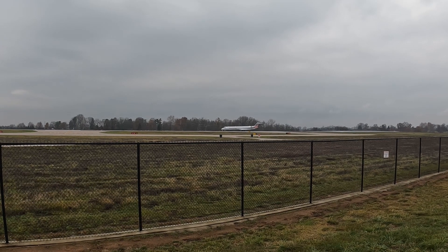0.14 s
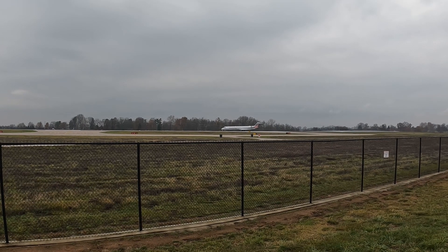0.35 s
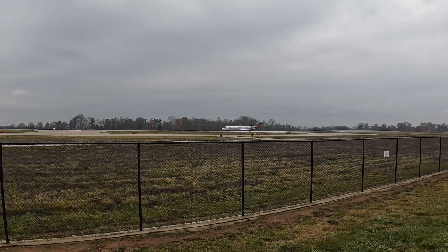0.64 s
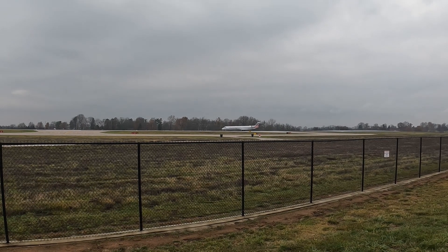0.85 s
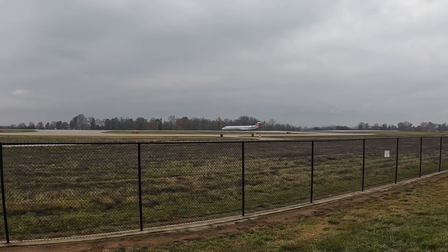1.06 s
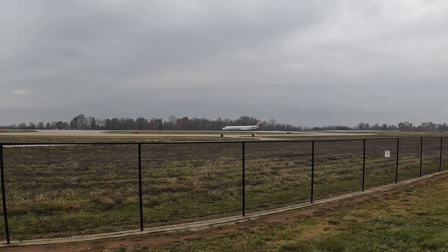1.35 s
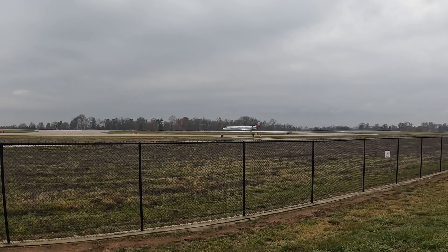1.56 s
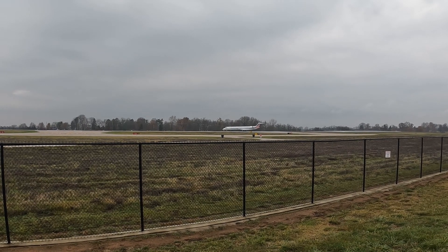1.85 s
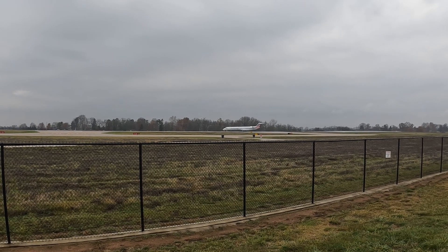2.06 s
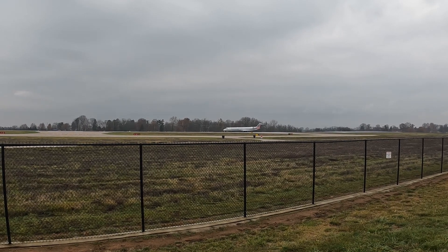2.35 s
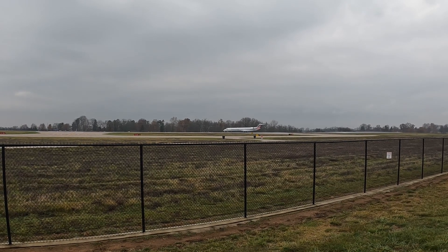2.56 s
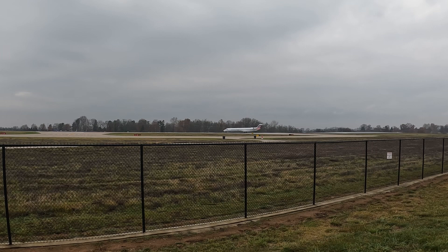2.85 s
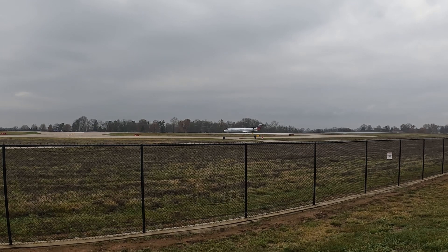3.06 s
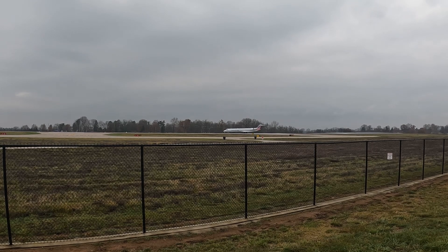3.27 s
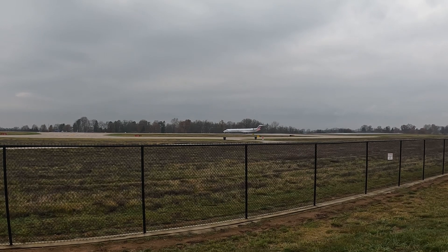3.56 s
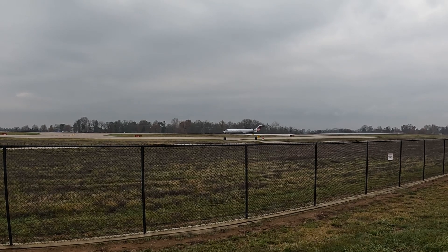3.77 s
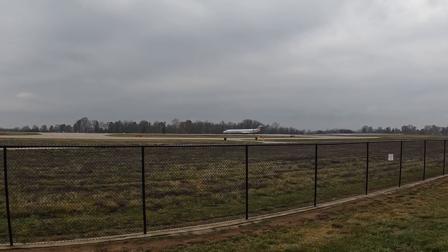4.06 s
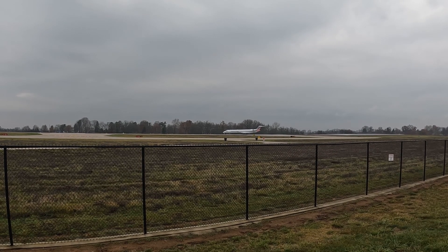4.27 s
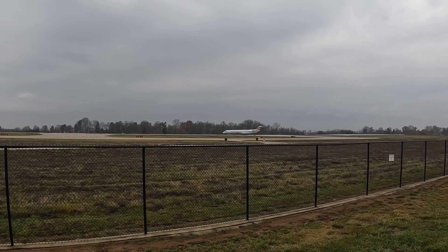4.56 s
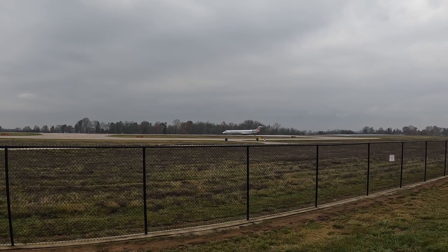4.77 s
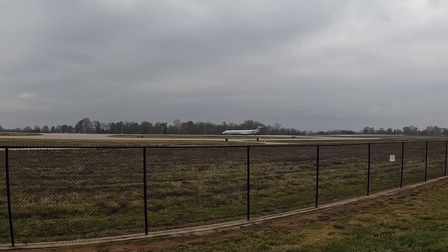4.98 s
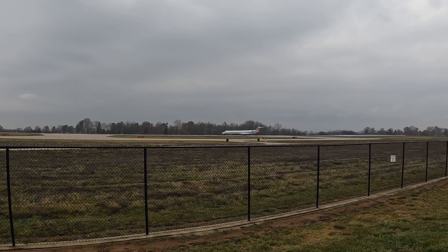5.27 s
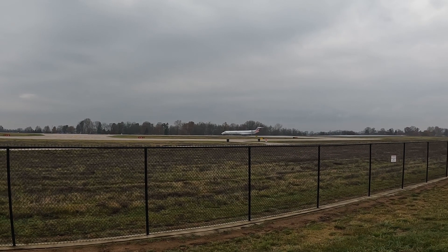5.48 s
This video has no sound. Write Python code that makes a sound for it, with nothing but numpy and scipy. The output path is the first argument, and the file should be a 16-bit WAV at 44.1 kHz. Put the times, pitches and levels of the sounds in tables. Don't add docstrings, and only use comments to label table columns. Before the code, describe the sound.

Across a wide open field, a passenger jet's engines idle with a wavering fan whine, soft inlet hiss and lumpy low exhaust rumble. About halfway through, the whine begins to climb, smoothly and faster, while the roar strengthens. Heard from far away on a handheld microphone, the sound is nearly mono until a wind gust strikes near the end, thudding and widening into stereo.

```python
import sys
import numpy as np
from scipy import signal
from scipy.fft import rfft, irfft, next_fast_len
from scipy.io import wavfile
from scipy.ndimage import uniform_filter1d, map_coordinates

SR = 44100
rng = np.random.default_rng(int(sys.argv[2]) if len(sys.argv) > 2 else 0)


def to_wav(sig):
    pcm = np.clip(np.atleast_2d(sig), -1, 1) * 32767
    pcm = np.round(pcm).astype(np.int16)
    wavfile.write(sys.argv[1], SR, pcm.T)


def magnitude_from_level(level_db):
    exponent = np.asarray(level_db, float) / 20
    return 10 ** exponent


N = 248724
TIME_S = np.arange(N) / SR


def unit(x):
    return x / np.sqrt(np.mean(x ** 2) + 1e-20)


def curves(rows):
    s, *columns = np.transpose(rows)
    return [np.interp(TIME_S, s, column) for column in columns]


def bumps(rows):
    s, db, half_width_s = np.transpose(rows)[..., None]
    t = np.arange(0, N + 64, 64) / SR
    total_db = np.sum(db * np.exp(-((t - s) / half_width_s) ** 2), axis=0)
    return np.interp(TIME_S, t, total_db)


def wobble(rate):
    at = np.arange(0, N + 8, 8)
    knots = rng.standard_normal(int(N * rate / SR) + 4)
    return np.interp(np.arange(N), at, map_coordinates(knots, [at * rate / SR]))


def rush(spectrum, patchy_db):
    z = signal.stft(rng.standard_normal(N), nperseg=512)[2]
    field = uniform_filter1d(uniform_filter1d(rng.standard_normal(z.shape), 5, 0), 20, 1)
    patchy = signal.istft(z * magnitude_from_level(patchy_db * unit(field)), nperseg=512)[1][:N]
    hz, db = np.transpose(spectrum)
    m = next_fast_len(N + 8192)
    log_hz = np.log(np.fft.rfftfreq(m, 1 / SR) + 1)
    colour = magnitude_from_level(np.interp(log_hz, np.log(hz + 1), db))
    return unit(irfft(rfft(patchy, m) * colour, m)[:N])


def even(x):
    span, share = int(.07 * SR), .7
    power = uniform_filter1d(uniform_filter1d(x ** 2, span), span)
    return unit(x / (np.abs(power) + 1e-9) ** (share / 2))


def carried(hz, spread_hz):
    turn = 2 * np.pi * np.cumsum(hz) / SR
    return unit(wobble(spread_hz) * np.cos(turn) + wobble(spread_hz) * np.sin(turn))


def tone(hz, smear, spread_hz):
    phase = 2 * np.pi * np.cumsum(hz) / SR + 0.27 * wobble(9)
    clean = np.sqrt(2) * np.sin(phase)
    return np.sqrt(1 - smear) * clean + np.sqrt(smear) * carried(hz, spread_hz)


# (time [s], peak [dB], half width [s])
FIZZES = [(0.1401, -85, 0.009), (0.1725, -80, 0.009), (0.2947, -84, 0.009), (0.3421, -90, 0.009),
          (0.4444, -77, 0.009), (0.5242, -80, 0.009), (0.5726, -77, 0.009), (0.7218, -75, 0.009),
          (0.8629, -87, 0.009), (0.9083, -84, 0.009), (1.1403, -77, 0.009), (1.1644, -82, 0.009),
          (2.135, -85, 0.009), (2.3161, -85, 0.009), (2.3444, -83, 0.009), (2.391, -85, 0.009),
          (2.6898, -81, 0.009), (2.7297, -78, 0.009), (3.039, -82, 0.009), (3.235, -85, 0.009),
          (3.3937, -84, 0.009), (3.6594, -85, 0.009), (3.7589, -86, 0.009), (3.9, -82, 0.009),
          (4.3166, -79, 0.009), (4.5321, -77, 0.009), (4.8894, -83, 0.009), (4.9217, -78, 0.009),
          (4.9377, -77, 0.009), (4.9776, -75, 0.009), (5.0095, -73, 0.009), (5.1961, -75, 0.009),
          (5.4071, -75, 0.009), (5.4201, -71, 0.009), (5.4394, -79, 0.009), (5.4605, -74, 0.009),
          (5.5563, -75, 0.009)]


def fizz():
    s, db, half_width_s = np.transpose(FIZZES)[..., None]
    t = np.arange(0, N + 64, 64) / SR
    puffs = magnitude_from_level(db - 12) * np.exp(-((t - s - half_width_s) / half_width_s) ** 2)
    gain = np.interp(TIME_S, t, np.sum(puffs, axis=0))
    return gain * rush([(7000, -30), (8500, 0), (13300, -3), (13700, -40)], 2)


def circuit_whistle(push_db):
    return magnitude_from_level(-110 + .4 * (push_db - 1.5)) * carried(np.full(N, 11750.), 350)


# (frequency [Hz], level [dB per Hz])
BUFFET = [(8, -22.5), (15, -4.5), (40, -6.5), (90, -7.5), (150, -11), (250, -46.5), (400, -120)]
# (frequency [Hz], level [dB per Hz])
FLUTTER = [(50, -120), (90, -10), (150, -12.5), (306, -0.5), (360, -14), (460, -15), (900, -36.5),
           (1500, -120)]


def port_wind(buffet_db, flutter_db):
    buffet = magnitude_from_level(buffet_db) * unit(magnitude_from_level(1.2 * wobble(20)) * rush(BUFFET, 0.93))
    return buffet + magnitude_from_level(flutter_db) * unit(magnitude_from_level(3.0 * wobble(25)) * rush(FLUTTER, 1.3))


# (time [s], change [dB], half width [s])
PUFFS = [
    (5.04, -25, 0.019),
    (5.185, 10.5, 0.01),
    (5.225, 1.5, 0.0099),
    (5.26, -6, .02),
    (5.355, 12.5, 0.012),
    (5.42, 12.5, 0.019),
    (5.57, -6, 0.013),
]
# (time [s], change [dB], half width [s])
FLUTTER_STRIKE = [
    (5.18, 6, .03),
]


def gust():
    strike_s, fade_db_per_s = 5.18, 2
    before_s = np.minimum(TIME_S - strike_s, 0)
    eased_db = bumps(PUFFS) - fade_db_per_s * np.maximum(TIME_S - strike_s, 0)
    buffet_db = -41.5 + 78 * before_s + eased_db
    flutter_db = -50 + 220 * before_s + eased_db + bumps(FLUTTER_STRIKE)
    side = port_wind(buffet_db, flutter_db)
    mid = port_wind(buffet_db - 1.5, flutter_db + 0.5) - 0.78 * side
    return mid, side


# (frequency [Hz], level [dB per Hz])
SCATTER = [(260, -35), (450, -22), (1080, -9), (1300, -9.5), (2120, -16), (2950, -29), (4720, -39),
           (5400, -24), (7020, -61), (11900, -120)]


def width(tones):
    open_s, open_db, open_db_per_s = 5.08, -7.5, 68
    side_db = open_db + open_db_per_s * np.minimum(TIME_S - open_s, 0)
    lag = np.roll(tones, 5) - np.roll(tones, -5)
    return magnitude_from_level(side_db) * (.25 * lag + magnitude_from_level(-58.5) * rush(SCATTER, 3.5))


# (time [s], thrust [dB], clearness of the air path [dB])
THRUST = [(0, -26.5, -3), (.35, -31, 2.5), (.55, -29.5, 3), (.9, -30, 0.5), (1.0, -29.5, -1.5),
          (1.1, -33.5, 1.5), (1.2, -32, 0), (1.6, -32, -1), (2.1, -34, -0.5), (2.45, -32.5, 0),
          (2.8, -31.5, .5), (3.2, -31.5, 2.5), (3.7, -32, 2.5), (4.05, -29, -0.5), (4.4, -27.5, -0.5),
          (4.8, -25, -0.5), (5.05, -25.5, 1.5), (5.2, -25, 2), (5.4, -26, 3.5), (5.64, -24, 2.5)]


def throttle():
    thrust_db, clear_db = curves(THRUST)
    return thrust_db + 32, clear_db


# (frequency [Hz], level [dB per Hz])
THUMP = [(8.8, -26), (15, -2), (45, 2.5), (90, -14.5), (120, -19.5), (200, -120)]
# (time [s], change [dB], half width [s])
BOOMS = [(.1, -5, 0.034), (.3, 1, .03), (.4, 14.5, 0.043), (.5, -11, .035), (.58, 8, 0.027), (.7, 5, 0.095),
         (.85, -2, 0.063), (.93, 6.5, .035), (1.08, 1, 0.036), (1.17, 10, 0.03), (1.28, 9.5, .03),
         (1.35, -3, 0.035), (1.43, 3.5, 0.053), (1.58, -9, 0.06), (1.73, 1, 0.043), (1.89, -7, 0.03),
         (2.01, 0, .03), (2.3, 2, 0.11), (2.46, -1, .04), (2.72, 5.5, .06), (2.87, 10, 0.037),
         (3.03, -4, .04), (3.15, 6, 0.051), (3.3, -5, 0.065), (3.44, -7, 0.027), (3.67, 5.5, 0.15),
         (3.82, -8, 0.029), (3.93, 6.5, .05), (4.1, -3, .04), (4.2, -1, .04), (4.35, 7, 0.014),
         (4.48, -10, 0.033), (4.62, 3.5, 0.067), (4.73, -12, 0.046), (4.85, -10, 0.061), (5, 4, .04),
         (5.3, 7, 0.064), (5.42, 6.5, 0.062), (5.49, -10, 0.034), (5.61, 2, 0.036)]


def thump(push_db):
    return magnitude_from_level(-35.5 + 1.33 * push_db + bumps(BOOMS)) * even(rush(THUMP, 0.41))


# (frequency [Hz], level [dB per Hz])
DRONE = [(32, -40), (55, 0.5), (80, 1.5), (110, -1), (140, -20.5), (200, -120)]
# (time [s], change [dB], half width [s])
SURGES = [(.1, 4, 0.042), (.24, -3, 0.034), (.36, 8, .07), (.46, 3.5, 0.023), (.6, 3.5, .04),
          (.68, -8, 0.03), (.73, 4.5, .025), (.85, -12, 0.1), (.95, 3, 0.023), (1.15, 7, 0.023),
          (1.4, -6.5, 0.089), (1.5, 5, 0.045), (1.8, 3, 0.11), (2.09, -7, .03), (2.2, 5, .04),
          (2.31, -6, .025), (2.7, 6, .04), (2.9, 0.5, 0.091), (3.1, 2, 0.022), (3.45, -3, .05),
          (3.6, 6, .04), (3.8, -7, 0.056), (3.95, 2, 0.021), (4.33, 3.5, 0.036), (4.45, -4, 0.021),
          (4.56, -1, 0.035), (4.78, 1.5, 0.033), (4.86, -1, .025), (4.94, 3, 0.034), (5.05, 4.5, .04),
          (5.14, 0, 0.034), (5.35, 8.5, 0.031), (5.48, 7, 0.044), (5.59, 7.5, 0.035)]


def drone(push_db):
    return magnitude_from_level(-35.5 + 0.96 * push_db + bumps(SURGES)) * even(rush(DRONE, 0.75))


# (frequency [Hz], level [dB per Hz])
ROAR = [(80, -42.5), (115, -2.5), (151, -1), (207, -12.5), (260, -25.5), (330, -29), (430, -51),
        (730, -120)]
# (time [s], change [dB], half width [s])
ROLLS = [(0, -14.5, 0.032), (.15, -2, .08), (.4, 2, 0.07), (.6, -0.5, .06), (.97, -3.5, 0.049),
         (1.17, 6, 0.069), (1.57, 1, 0.043), (1.72, -4.5, 0.037), (1.8, 3, 0.023), (1.95, -1, 0.045),
         (2.1, 2, 0.058), (2.27, -4.5, 0.055), (2.45, -1, 0.029), (2.58, -6.5, 0.025), (2.68, -6, .02),
         (2.95, 2, 0.044), (3.22, -8, 0.062), (3.36, 2.5, 0.06), (3.6, -1, .1), (3.9, 0, 0.11),
         (4.25, 3, .04), (4.45, 4.5, .03), (4.6, -2, 0.064), (4.76, -3.5, 0.02), (4.95, -0.5, 0.064),
         (5.14, 0.5, .04), (5.34, -5.5, .025), (5.42, 5.5, .03), (5.6, 2, .05)]


def roar(push_db):
    return magnitude_from_level(-35.5 + 0.85 * push_db + bumps(ROLLS)) * even(rush(ROAR, 0.95))


# (frequency [Hz], level [dB per Hz])
GROWL = [(150, -61), (190, -4), (230, 1.5), (290, -5), (360, -11.5), (450, -66)]
# (time [s], change [dB], half width [s])
GROWLS = [(.02, 13, 0.058), (.28, 11, .03), (.38, 18, 0.069), (.5, 13.5, 0.033), (.63, 12, .06),
          (.73, 7, .03), (1.05, 6, .04), (1.16, 16.5, .04), (1.32, 7.5, .04), (1.5, 9.5, 0.044),
          (1.68, 9, .025), (2.88, 8.5, .04), (2.97, 11.5, .035), (3.25, 11, .03), (3.42, 6.5, .05),
          (4.13, 6, .04), (4.37, 8.5, .04), (5.05, 11.5, 0.12), (5.18, 12.5, 0.035), (5.3, 9.5, .06)]


def growl():
    return magnitude_from_level(-56 + bumps(GROWLS)) * even(rush(GROWL, .5))


# (frequency [Hz], level [dB per Hz])
BODY = [(150, -25.5), (250, -1), (354, -4), (446, -1.5), (524, -3.5), (796, -5), (877, -5), (1390, -9.5),
        (2100, -20), (2730, -42.5), (4620, -120)]


def body(push_db, clear_db):
    return magnitude_from_level(-47 + 0.22 * push_db + clear_db) * rush(BODY, 0.37)


# (frequency [Hz], level [dB per Hz])
HISS = [(1000, -39.5), (1700, -2), (2140, -5.5), (2800, -5.5), (3810, -5), (4600, -10), (5400, -15.5),
        (6300, -23.5), (7020, -28.5), (8000, -33.5), (8600, -35.5), (8950, -54.5), (9400, -76.5),
        (14000, -86)]
# (time [s], change [dB], half width [s])
HISS_SWELLS = [
    (.08, -1.5, 0.044),
    (.55, 1, 0.18),
    (1.45, -0.5, .1),
    (2.38, 2, 0.16),
    (3.3, -2.5, 0.28),
    (3.9, 0, .12),
    (4.35, 1, 0.14),
    (5.19, 2, 0.044),
]


def hiss(push_db, clear_db):
    level_db = -56 + .6 * push_db + 0.29 * clear_db + bumps(HISS_SWELLS)
    return magnitude_from_level(level_db + 0.19 * wobble(6.5)) * rush(HISS, 1.1)


# (frequency [Hz], level [dB per Hz])
FRINGE = [(8300, -40), (8800, 0), (9500, -3), (9900, -40)]


def fringe(push_db):
    return magnitude_from_level(-108 + .5 * push_db + 4 * wobble(22)) * rush(FRINGE, 7)


# (time [s], change [dB], half width [s])
HUM_SWELLS = [(0, 0, .25), (.42, 7.5, .05), (.56, 11, .03), (.66, 13, .04), (.74, -1, .03),
              (.82, 13.5, .03), (.92, 9, .03), (1.02, -1.5, .07), (1.5, 4, 0.13), (1.8, -3, 0.085),
              (2.1, 1.5, .12), (2.4, 3, .1), (2.7, 0.5, .1), (3, 3, 0.21), (3.5, -12, .25), (4.85, -20, .4),
              (5.6, -9, 0.45)]


def combustor():
    start_hz, drift_hz, drift_s = 685, 80, 2
    hum_hz = start_hz + drift_hz / 2 * (1 + np.tanh((TIME_S - drift_s) / .9))
    return magnitude_from_level(-56 + bumps(HUM_SWELLS) + 0.75 * wobble(14.0)) * carried(hum_hz, 120)


# (time [s], change [dB], half width [s])
GENERATOR_SWELLS = [
    (.4, -11, 0.4),
    (1.7, 5, 0.54),
    (2.35, 9, 0.069),
    (3.3, 12, .08),
    (3.7, -7, 0.18),
    (4.25, 4.5, .25),
    (5.4, -9.5, 0.5),
]


def generator():
    level_db = -64 + 1.6 * wobble(8.2) + bumps(GENERATOR_SWELLS)
    return magnitude_from_level(level_db) * tone(np.full(N, 800), 0.15, 25)


# (time [s], change [dB], half width [s])
WHINE_SWELLS = [
    (2.45, 6, .15),
    (3.15, 6, .25),
    (4.95, 5, .08),
]


def compressor(blade_hz, progress, awake):
    idle_hz, rise_hz, bend = 7460, 1050, .65
    whine_hz = idle_hz + rise_hz * uniform_filter1d(progress ** bend, SR // 4, mode="nearest")
    whine_db = -98 + 7 * awake - 7 * progress + 2.7 * wobble(8.2) + bumps(WHINE_SWELLS)
    whine = magnitude_from_level(whine_db) * tone(whine_hz, .8, 90)
    sideband_swells = [(3.05, -11, .2), (3.45, 2, .12), (4.1, 4, 0.16), (4.55, -19, .2), (5.2, -12, .5)]
    sideband_db = -105 + 5 * awake - 40 * progress ** 2 + bumps(sideband_swells)
    sideband = magnitude_from_level(sideband_db + 4.4 * wobble(8.3)) * tone(whine_hz + blade_hz, .6, 40)
    return whine + sideband


# (time [s], blade rate [Hz])
FAN = [(0, 1292), (1.3, 1289), (2.45, 1289), (2.75, 1309), (3, 1352), (3.5, 1458), (4, 1593), (4.3, 1695),
       (4.6, 1837), (4.9, 1973), (5.1, 2048), (5.3, 2090), (5.5, 2132), (5.64, 2166)]


def spool():
    idle_hz, takeoff_hz = 1288, 2150
    blade_hz = uniform_filter1d(curves(FAN)[0], SR // 8, mode="nearest")
    progress = np.clip((blade_hz - idle_hz - 6) / (takeoff_hz - idle_hz), 0, 1.1)
    return blade_hz, progress, np.tanh(11 * progress)


def spool_level(row, progress, awake):
    idle_db, wake_db, full_db = row
    return idle_db + wake_db * awake + full_db * progress


# (idle [dB], throttle gain [dB], full-speed gain [dB])
INFLOW_DB = [(-55.5, -13.5, 12), (-66.5, -2, 2.5), (-72.5, 5.5, -6)]
# (time [s], change [dB], half width [s])
INFLOW_SWELLS = [
    (.35, 9, 0.6),
    (5.2, 11.5, 0.39),
]
INFLOW_SHARES = [0.33, 1.1, -0.58]


def inflow(blade_hz, progress, awake):
    shapes = [(.95, 497.2), (1.95, 894), (2.95, 892)]  # (multiple, spread Hz)
    swell_db = bumps(INFLOW_SWELLS)
    humps = np.zeros(N)
    for row, share, (multiple, spread_hz) in zip(INFLOW_DB, INFLOW_SHARES, shapes):
        level_db = spool_level(row, progress, awake) + share * swell_db + wobble(5)
        humps += magnitude_from_level(level_db) * carried(multiple * blade_hz, spread_hz)
    return humps


# (idle [dB], throttle gain [dB], full-speed gain [dB])
ORDERS_DB = [(-56, -3.5, 10), (-80, 17, -1), (-66, -2.5, -12.5), (-77, 3, -18)]
# (time [s], change [dB], half width [s])
EDDIES_1ST = [(.36, 3.5, 0.057), (.48, 4, 0.059), (1.07, 5, 0.026), (.18, -8, 0.023), (.82, -6.5, 0.044),
              (.945, -1, .015), (.995, 11, 0.032), (1.03, -13, 0.013), (1.2, 11, 0.039), (1.39, -9, 0.11),
              (1.58, 3.5, 0.061), (1.659, 5, .015), (1.69, -9, .015), (1.74, 5, 0.014), (1.79, 13.5, 0.016),
              (1.83, 1, .015), (1.885, 2, .025), (1.96, 8, 0.17), (2.115, -11, 0.016), (2.145, 9, 0.013),
              (2.28, -7, 0.093), (2.64, -6, 0.064), (2.9, 5.5, 0.12), (3.2, 0.5, 0.065), (3.4, -3, .02),
              (3.55, 4, 0.093), (3.79, 4, 0.054), (3.87, -3, 0.02), (3.95, 7, 0.044), (4.04, 2, .035),
              (4.09, -9, 0.013), (4.17, 10, 0.086), (4.55, 3, .03), (4.7, -1, 0.036), (4.83, 2, 0.036),
              (4.95, 4, 0.019), (4.36, -8, 0.18), (4.63, -11, 0.031), (4.98, -28, 0.0085),
              (5.01, 11, 0.015), (5.09, -14, 0.046), (5.155, 11, 0.0084), (5.2, 0.5, 0.035), (5.4, 4, 0.39),
              (5.64, -9, 0.056)]
EDDIES_2ND = [(0, 19, 0.045), (.24, 18, .07), (.48, 21, 0.076), (.96, 12, 0.065), (2.3, 14, 0.089),
              (2.64, 16, .07), (3.01, 6, .04), (3.14, 7, 0.061), (3.24, 0.5, .04), (3.38, 1, .07),
              (3.6, 5.5, 0.1), (3.72, -1, .04), (3.84, 5, .07), (4.17, 12, 0.055), (3.93, 5, 0.011),
              (3.965, 0, 0.014), (4.05, -6, .03), (4.3, -15, .05), (4.42, 7.5, .03), (4.55, 6, .05),
              (4.68, 2.5, .05), (4.8, 10, .04), (4.92, 3.5, .04), (5.01, 3, 0.028), (5.12, 11, .05),
              (5.23, 10, .04), (5.33, -6, .03), (5.44, 11, 0.043), (5.54, 1, .03), (5.62, 6, 0.035)]
EDDIES_3RD = [(0, 15.5, 0.025), (.48, 0, 0.077), (.84, -2, 0.051), (1.08, 3, .07), (1.2, -20, 0.064),
              (1.74, 4.5, 0.091), (2.04, -12, 0.083), (2.28, -9.5, 0.056), (2.4, 3, 0.037), (2.6, 1, .04),
              (2.7, 3.5, 0.036), (2.82, 2, .06), (2.96, 5, .04), (3.1, 7, .02), (3.24, 8, 0.064),
              (3.36, -12.5, 0.083), (3.88, 13, .12), (4.1, 6, .07), (4.25, 5, .05), (4.44, -5.5, .08),
              (4.68, 6, 0.076), (5, 5, .12)]
EDDIES_4TH = [(.5, -3, .08), (.72, 6, 0.064), (1, 3.5, .1), (1.65, -8, .1), (2.2, -2, 0.065), (2.93, 4, .1),
              (3.2, 0.5, .1), (3.48, 3, .06), (3.65, -6, .12), (3.9, 0, 0.22), (4.32, 7, .07),
              (5, -10.5, .5)]


def blade_tones(blade_hz, progress, awake):
    eddies = [EDDIES_1ST, EDDIES_2ND, EDDIES_3RD, EDDIES_4TH]
    blur = [(.2, 80), (.28, 120), (.5, 150), (.6, 170)]  # (scattered share, spread Hz)
    flicker_db = [2.2, 1.6, 2.4, 2.5]
    tones = np.zeros(N)
    for k, row in enumerate(ORDERS_DB):
        level_db = spool_level(row, progress, awake) + bumps(eddies[k]) + flicker_db[k] * wobble(24)
        tones += magnitude_from_level(level_db) * tone((k + 1) * blade_hz, *blur[k])
    return tones


def scene():
    push_db, clear_db = throttle()
    blade_hz, progress, awake = spool()
    heard_hz = blade_hz * (1 + .004 * wobble(14))
    wind_mid, wind_side = gust()
    exhaust = thump(push_db) + drone(push_db) + roar(push_db) + growl() + body(push_db, clear_db)
    air = hiss(push_db, clear_db) + fringe(push_db)
    core = combustor() + generator() + compressor(blade_hz, progress, awake)
    tones = blade_tones(heard_hz, progress, awake)
    fans = tones + inflow(heard_hz, progress, awake)
    mid = wind_mid + exhaust + air + core + fans + circuit_whistle(push_db)
    side = width(tones) + wind_side
    return np.array([mid + side, mid - side])


def roll_off(x):
    return signal.sosfilt(signal.butter(12, 13500, fs=SR, output="sos"), x)


def record(dry):
    rounded = dry / (1 + np.abs(dry / 0.51) ** 3) ** (1 / 3)
    mix = rounded + fizz() + .0005
    return roll_off(mix)


dry = scene()
out = record(dry)
to_wav(out)
```